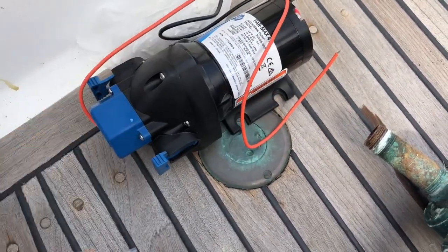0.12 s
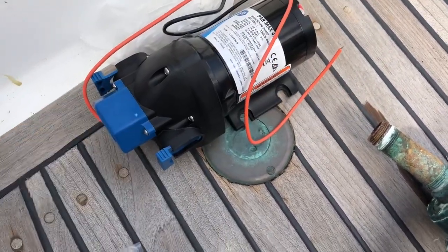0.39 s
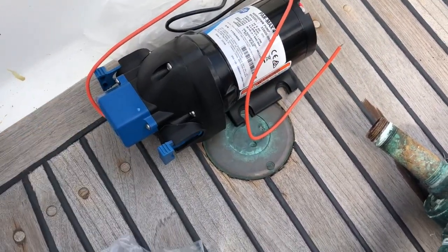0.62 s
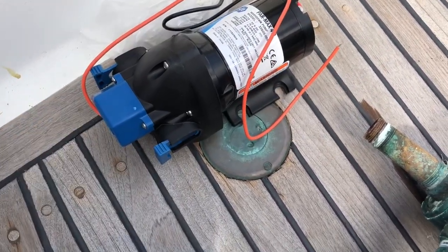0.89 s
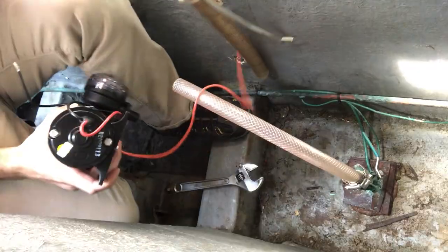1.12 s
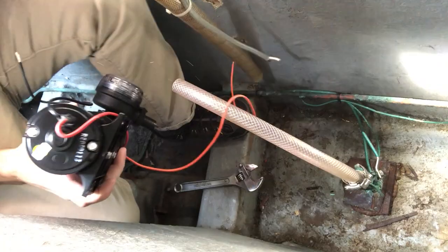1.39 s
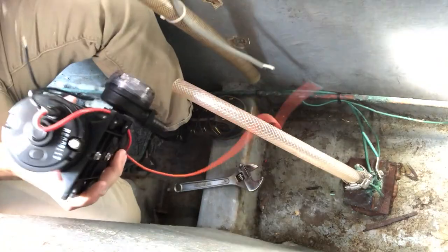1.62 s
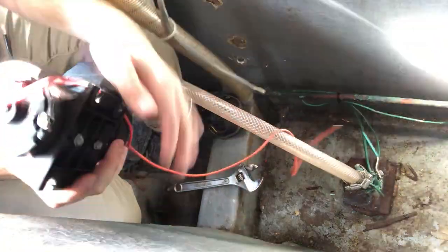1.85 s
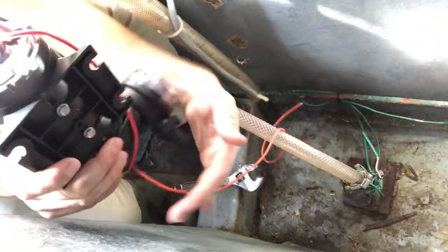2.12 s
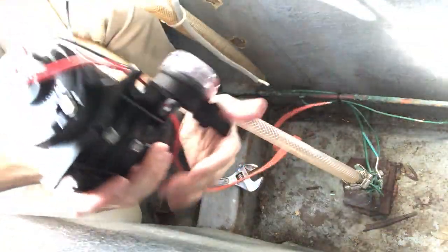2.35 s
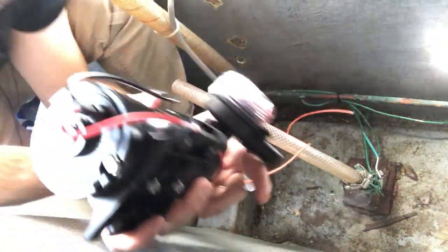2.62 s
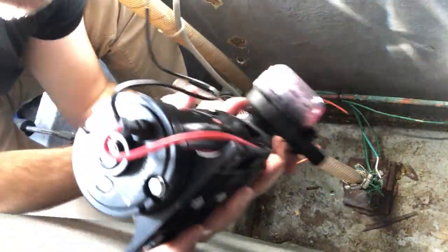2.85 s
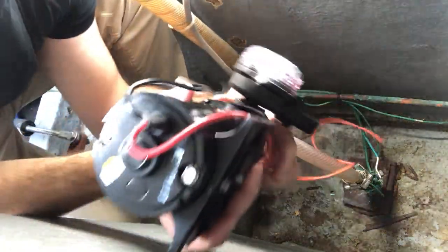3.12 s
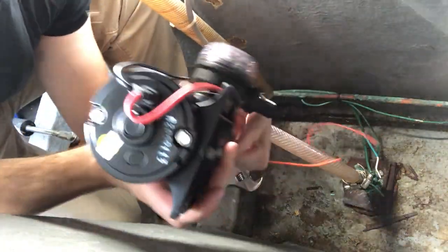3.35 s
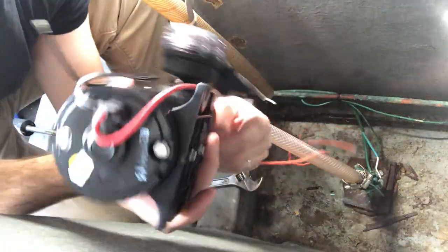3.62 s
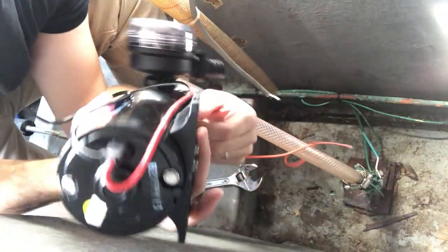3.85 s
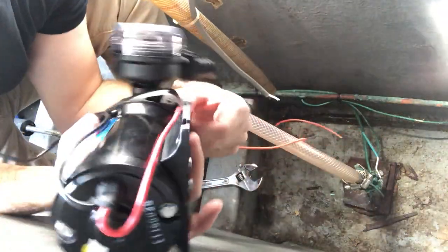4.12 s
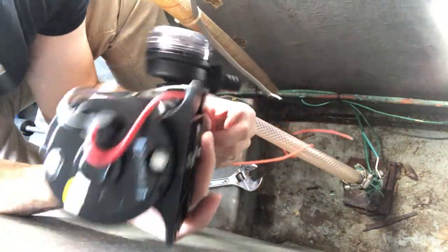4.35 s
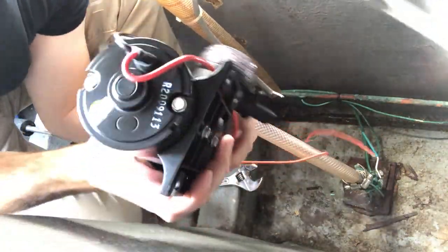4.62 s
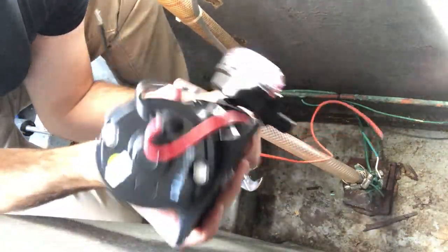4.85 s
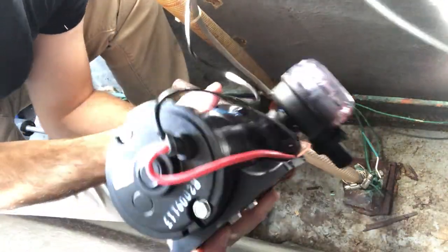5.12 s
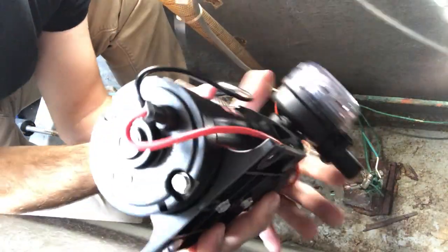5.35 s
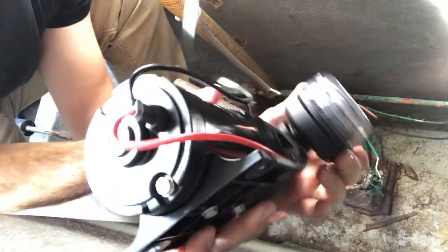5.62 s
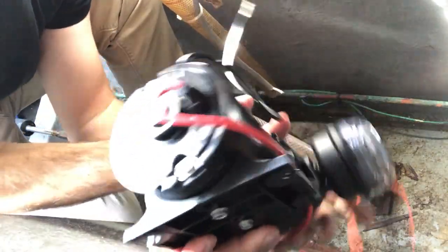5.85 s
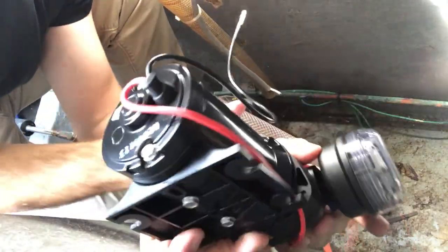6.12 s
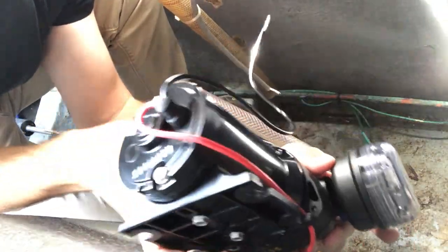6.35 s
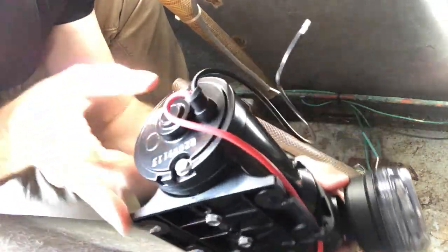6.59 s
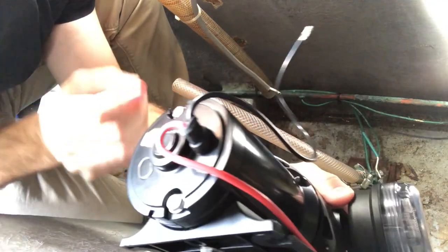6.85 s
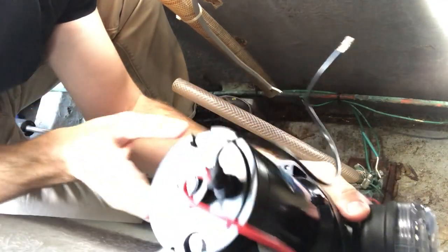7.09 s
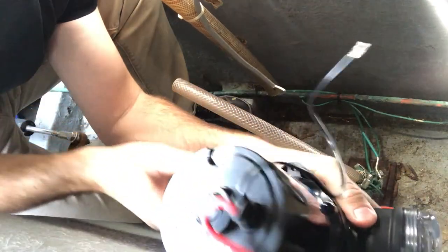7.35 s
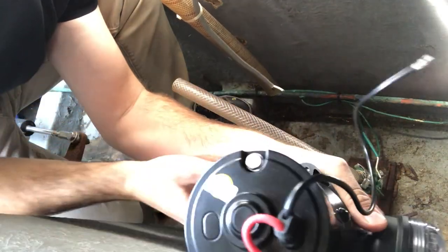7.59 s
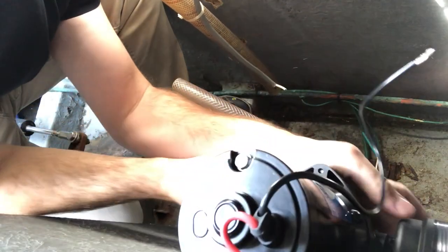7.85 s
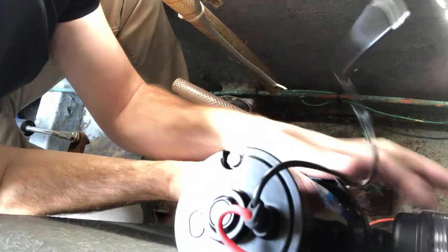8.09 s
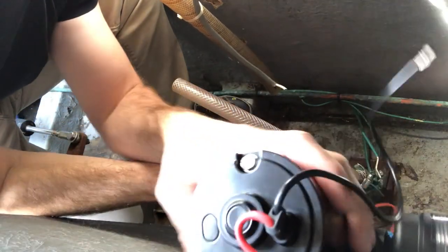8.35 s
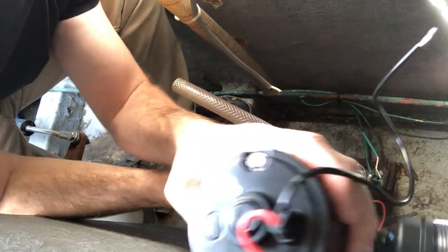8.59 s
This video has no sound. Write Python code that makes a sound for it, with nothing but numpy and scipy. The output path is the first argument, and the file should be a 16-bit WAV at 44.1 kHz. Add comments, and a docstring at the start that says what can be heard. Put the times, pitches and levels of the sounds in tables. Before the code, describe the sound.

Close microphone, mono. About half a second of low deck rumble, then sharp dry crackles of stiff wrapping and a tiny clip bouncing. The place changes abruptly to a small hollow locker: hands, hose and wires rub a plastic pump, with soft knocks, one dull boom midway, a quiet lull, a hard double clack, squeaky scrapes, and finally deep thumps with bright clicks.

```python
"""A plastic pump and its fittings are handled close to the microphone: hands, hose and wires rub and scrape in strokes.
The strokes are shaped noise, and some sing as narrow bands; small parts tick as short noise bursts.
First comes an open boat deck, where wrapping crackles over a low rumble, all made from filtered noise.
Then comes a small locker whose hollow air booms at every knock, as a set of dying sine tones."""
import sys
import numpy as np
from scipy import signal
from scipy.fft import rfft, irfft, next_fast_len
from scipy.io import wavfile
from scipy.ndimage import uniform_filter1d, map_coordinates

SR = 44100
rng = np.random.default_rng(int(sys.argv[2]) if len(sys.argv) > 2 else 0)


def to_wav(sig):
    """Store sig (one row per channel, or 1-D mono) as 16-bit WAV at the path in sys.argv[1].

    Samples outside -1..1 are clipped; the rate is SR.
    """
    pcm = np.clip(np.atleast_2d(sig), -1, 1) * 32767
    pcm = np.round(pcm).astype(np.int16)
    wavfile.write(sys.argv[1], SR, pcm.T)  # frames by channels


def ratio_of_db(decibels):
    """Turn decibels (scalar or array-like) into linear amplitude factors; 0 dB maps to 1."""
    return 10 ** (np.asarray(decibels, float) / 20)


N = 384552  # length in samples
INSIDE_S = 1.07  # from here on the scene is in the locker

# faint hiss of air and microphone, before scaling to rms 1: f/Hz, level/dB
FAR_HISS_COLOUR = [(290, -49), (500, 3), (1340, -11), (7640, -26), (9360, -17), (11600, -26), (16000, -4.5)]
# loudness of the background rumble: t/s, level/dB
RUMBLE_LEVEL = [(0, -44), (1.05, -48), (1.15, -53.5), (1.5, -56.5), (2.4, -58.5), (4.1, -58.5),
                (4.4, -54.5), (5.2, -62), (5.9, -55), (6.4, -58.5), (7.3, -57), (7.6, -48.5), (8.35, -43.5),
                (8.72, -60)]
# rumble in the open, before scaling to rms 1: f/Hz, level/dB
DECK_COLOUR = [(15, -48), (25, -22), (46, -15), (75, 3), (166, -10), (238, -29), (399, -24), (659, -33.5),
               (1200, -33.5), (2200, -42), (4500, -72)]
# rumble inside the locker, before scaling to rms 1: f/Hz, level/dB
LOCKER_COLOUR = [(15, -81), (25, -39), (36, -15.5), (60, -2.5), (74, -5.5), (91, -14.5), (151, -14),
                 (216, -13.5), (262, -26), (1200, -45), (1560, -88), (2640, -120)]
# what the locker and pump body ring with: f/Hz, level/dB, base t60/s (knocks ring shorter)
HOLLOW_MODES = [(72.8, 15.5, 0.39), (160.2, 9, 0.32), (186.2, 3, 0.28), (235.1, 0, 0.27),
                (254.7, 2.5, 0.34), (299, -2.5, 0.15), (361.3, -6.5, 0.25), (441, -2, 0.19),
                (487.5, 2.5, 0.34), (543, -1, 0.47), (667, -4.5, 0.34), (795.5, 0.5, 0.24), (882, 6, 0.15),
                (990, -5, 0.55), (1080, 5.5, 0.12), (1235, -1, .16), (1310, 5.5, 0.064), (1410, -4, 0.47)]
# dull knocks that shake the locker: t/s, level/dB before the last filter, centre f/Hz, spread/octaves,
# contact/s (cut shorter for modes above 600 Hz)
LOCKER_KNOCKS = [(1.078, -35, 293, 0.64, 0.042), (1.177, -36.5, 790, 1.6, 0.029),
                 (1.295, -41.5, 228, 0.52, 0.026), (1.511, -37, 201, 1.26, 0.042),
                 (1.911, -48, 450, 0.48, 0.012), (2.128, -43.5, 211, 1.34, 0.016),
                 (2.361, -32.5, 284, 0.81, 0.016), (3.283, -35, 554, 0.23, 0.0096),
                 (3.300, -41, 510, 0.3, 0.023), (3.673, -54, 1150, 0.23, 0.0093),
                 (4.046, -50.5, 1120, 0.2, 0.012), (4.206, -24, 316, 0.56, 0.018),
                 (4.206, -44, 1310, 0.11, 0.027), (5.378, -53.5, 1140, 0.37, 0.01),
                 (5.94, -30, 900, 1.7, 0.0095), (5.97, -16.5, 690, 1.25, 0.0064),
                 (6.364, -39, 1080, 0.47, 0.019), (6.49, -43, 1310, 0.41, 0.03),
                 (6.849, -37.5, 415, 1.7, 0.012), (7.443, -17, 144, 0.97, 0.02),
                 (7.788, -35, 135, 1.03, 0.016), (7.92, -15, 152, 0.93, 0.019),
                 (8.249, -32, 1430, 0.97, 0.013), (8.278, -23, 134, 0.66, 0.02),
                 (8.546, -33, 149, 0.93, 0.011), (8.68, -19.5, 270, 0.61, 0.042)]
# time the locker echo takes to die: f/Hz, t60/s
WALL_DECAY = [(500, 0.3), (2000, 0.14), (6000, 0.11), (14000, 0.2)]
# fittings ticking and cracking: t/s, level/dB, colour f/Hz, colour width/octaves (at most 6 used), t60/s
FITTING_TICKS = [(1.179, -27, 3020, 6.7, 0.077), (1.242, -36.5, 3120, 2.3, 0.018),
                 (3.276, -39, 4630, 2, 0.014), (3.625, -45, 4870, 0.34, 0.017),
                 (3.6741, -42.5, 2180, 5, 0.039), (4.046, -36, 5000, 2, 0.01),
                 (4.209, -42.5, 2170, 1.5, 0.026), (4.361, -49.5, 3950, 1.6, 0.038),
                 (5.3758, -28.5, 5240, 3.5, 0.011), (5.9404, -19, 1940, 3.9, 0.031),
                 (5.9724, -20.5, 1770, 4.6, 0.059), (6.157, -43, 1930, 1.9, 0.045),
                 (6.245, -47, 11800, 0.57, 0.066), (6.3674, -42.5, 1680, 1.4, 0.043),
                 (6.6887, -37, 7700, 5.4, 0.029), (6.8503, -33, 2820, 3.6, 0.0052),
                 (7.181, -39, 4770, 0.49, 0.017), (7.417, -41, 1560, 1.9, 0.018),
                 (7.445, -32.5, 1600, 1.5, 0.024), (7.8334, -33.5, 2880, 2.7, 0.013),
                 (7.9204, -50, 1620, 1.1, 0.0083), (7.9382, -26, 2200, 2.04, 0.026),
                 (8.0222, -35, 1710, 0.93, 0.01), (8.2499, -14, 7000, 4.5, 0.026),
                 (8.2834, -17, 3840, 2.6, 0.023), (8.4745, -46, 2280, 3.9, 0.022),
                 (8.6623, -46.5, 1690, 2.1, 0.025), (8.6827, -43, 1850, 2.9, 0.033)]
# resonances of the hard plastic fittings: f/Hz, width/Hz, level/dB
FITTING_RINGS = [(1150, 1600, 11.5), (1494, 43, 8), (2660, 570, -5), (3200, 1160, 1.5), (4670, 1700, -8.5),
                 (5670, 1170, 3), (7000, 350, 5)]
# loud snaps on the deck, the first of them a dull knock: t/s, level/dB, colour f/Hz, treble snap level/dB over
# the body
DECK_SNAPS = [(0.4425, -43, 700, -30), (0.5066, -43, 4680, 0), (0.4719, -30, 5700, -7),
              (0.5212, -22.5, 7520, 2), (0.5325, -31, 1880, 2), (0.558, -27, 5000, 2),
              (0.5746, -25, 5600, -22), (0.595, -45, 2320, -20), (0.6818, -34.5, 3900, -30),
              (0.702, -35, 3710, -6), (0.7154, -40, 2440, -5), (0.749, -37, 2700, -21),
              (0.765, -29, 4430, -25), (0.782, -24, 3560, -35), (0.822, -24, 4200, -32),
              (0.8425, -30, 4940, -5), (0.8447, -25.5, 4200, 0), (0.8659, -49, 2910, -15),
              (0.9233, -31.5, 5240, -14), (0.979, -44, 4870, -4)]
# strokes in which one part sings: start t/s, end t/s, f/Hz, filter width/Hz, rms level/dB before fades
SINGING_BANDS = [(1.38, 1.505, 1560, 69, -61.5), (1.52, 1.957, 193, 18, -60), (3.55, 4.105, 216, 50, -67),
                 (3.669, 3.96, 1120, 100, -69.5), (5.597, 5.786, 2570, 340, -79),
                 (6.356, 6.48, 7400, 1200, -65), (6.502, 6.573, 7600, 700, -62.5),
                 (6.547, 6.73, 3060, 350, -64), (6.55, 6.67, 4470, 350, -64),
                 (6.903, 6.977, 3440, 400, -71), (6.15, 6.36, 860, 110, -59.5),
                 (6.15, 6.33, 1400, 110, -65), (7.06, 7.22, 1240, 59, -55.5), (7.04, 7.15, 1080, 84, -57),
                 (5.0, 5.3, 820, 120, -76.5), (4.3, 4.58, 500, 100, -68.5), (7.0, 7.2, 5600, 600, -68),
                 (8.02, 8.19, 820, 100, -62)]
# bright scrape, before scaling to rms 1: f/Hz, level/dB
SCRAPE_COLOUR = [(650, -21), (1100, -9.5), (1170, -5), (1280, -9), (1390, -4.5), (1830, -3.5), (4950, -1),
                 (9000, -18.5), (11700, -18.5), (19800, -120)]
# dull drag, before its resonances and scaling to rms 1: f/Hz, level/dB
DRAG_COLOUR = [(76, -50), (130, -15.5), (161, 2), (321, -4), (468, -1), (727, -5), (1070, -8),
               (1700, -12.5), (3000, -14), (8000, -70)]
# fine hiss of rubbing, before scaling to rms 1: f/Hz, level/dB
RUB_HISS_COLOUR = [(4410, -10.5), (7500, -5), (8730, -10), (13300, -10), (16000, -13)]
# how busily the hands shift their grip between strokes: t/s, scrape level/dB
GRIP_LEVEL = [(0, -77), (.4, -75.5), (1.0, -56), (1.6, -63), (1.72, -67), (2.0, -64.5), (3.3, -62.5),
              (3.5, -71), (4.1, -75.5), (4.9, -78.5), (5.1, -71.5), (5.9, -70), (6.7, -68.5), (6.85, -71.5),
              (7.6, -72), (8.1, -58.5), (8.6, -76), (8.72, -71)]
# rubbing strokes: start t/s, length/s, scrape level/dB, dull drag level/dB, fine hiss level/dB
RUB_STROKES = [(0.334, 0.29, -80, -59, -69), (0.478, .12, -49.5, -52, -53.5),
               (0.687, 0.15, -48, -59.5, -53.5), (0.871, 0.1, -58, -69, -49.5),
               (1.05, 0.16, -76, -73, -76.5), (1.196, 0.13, -67, -55, -65),
               (1.455, 0.14, -60.5, -57, -62.5), (1.705, 0.23, -70, -58.5, -65),
               (1.915, 0.24, -58.5, -88, -57.5), (2.108, 0.024, -73, -66, -61),
               (2.21, 0.17, -61.5, -82, -61), (2.363, 0.41, -65, -84, -58.5),
               (2.716, 0.41, -86, -64.5, -73), (2.969, .17, -66, -66, -56.5), (3.223, 0.17, -71, -84, -60),
               (3.486, 0.069, -70.5, -63, -78), (3.596, 0.037, -78, -59, -65), (3.652, 0.13, -80, -65, -91),
               (3.744, 0.038, -69, -68, -74), (3.889, 0.064, -74, -65.5, -71), (4.337, 0.1, -71, -68, -74),
               (4.45, 0.13, -81, -70, -88), (4.623, 0.023, -75, -79, -75), (4.997, 0.13, -70, -65.5, -80),
               (5.24, 0.17, -68, -76, -74), (5.37, 0.065, -68, -70, -60), (5.535, .18, -71.5, -90, -65.5),
               (5.69, 0.22, -88, -73, -72), (6.114, 0.21, -61.5, -55, -73), (6.35, 0.14, -60, -61.5, -62.5),
               (6.48, 0.099, -55.5, -51.5, -59), (6.584, 0.1, -62, -59.5, -58.5),
               (6.998, .2, -55.5, -48, -70), (7.27, 0.069, -71.5, -73, -73), (7.576, 0.046, -68, -59, -83),
               (7.685, 0.031, -71, -64, -71), (7.711, 0.19, -69, -52, -70), (7.965, .12, -80, -60, -55.5),
               (8.114, 0.24, -68.5, -56.5, -52), (8.319, .16, -65, -63, -65.5)]


def unit(x):
    """Scales a sound to rms 1."""
    return x / np.sqrt(np.mean(x ** 2) + 1e-20)


def peak(x):
    """Scales a sound to peak 1."""
    return x / np.abs(x).max()


def along(points, hz):
    """Reads a curve of (frequency, value) points on a log frequency axis."""
    f, v = np.transpose(points)
    return np.interp(np.log(hz + 1), np.log(f + 1), v)


def curves(rows):
    """Gives one value per sample for each column after the time."""
    s, *cols = np.transpose(rows)
    return [np.interp(np.arange(N) / SR, s, c) for c in cols]


def wobble(rate):
    """Draws a smooth random curve with this many knots a second."""
    return map_coordinates(rng.standard_normal(N // 100), [np.arange(N) * rate / SR])


def filtered(x, response):
    """Multiplies the spectrum of x by a response that depends on frequency."""
    m = next_fast_len(len(x) + 4096)
    return irfft(rfft(x, m) * response(np.fft.rfftfreq(m, 1 / SR)), m)[:len(x)]


def resonance(hz, centre_hz, width_hz):
    """Response of something that rings at one frequency, with gain 1 at its centre."""
    return 1j * hz * width_hz / (centre_hz ** 2 - hz ** 2 + 1j * hz * width_hz)


def add(track, s, sound):
    """Mixes a sound into the track at time s in seconds."""
    part = track[round(s * SR):][:len(sound)]
    part += sound[:len(part)]


def patchy(x, patch_db, window, bins, frames):
    """Raises and lowers random patches of time and frequency; bins and frames set the patch size."""
    z = signal.stft(x, nperseg=window)[2]
    field = uniform_filter1d(rng.standard_normal(z.shape), bins, axis=0)
    field = uniform_filter1d(field, frames, axis=1)
    return signal.istft(z * ratio_of_db(patch_db * unit(field)), nperseg=window)[1][:N]


def grit(spectrum, flutter_db, flutter_rate, patchy_db):
    """Coloured noise of rms 1 with a random flutter in level and patches of colour."""
    noise = rng.standard_normal(N) * ratio_of_db(flutter_db * wobble(flutter_rate))
    noise = patchy(noise, patchy_db, window=512, bins=6, frames=8)
    return unit(filtered(noise, lambda hz: ratio_of_db(along(spectrum, hz))))


def streaked(x):
    """Random narrow streaks of tone slowly come and go in the rubbing."""
    return unit(patchy(x, 2.8, window=1024, bins=2, frames=16))


def far_hiss():
    """A faint, slightly uneven hiss of air and microphone lies under everything."""
    return ratio_of_db(-84.0) * grit(FAR_HISS_COLOUR, flutter_db=3.0, flutter_rate=5.1, patchy_db=4.5)


def rumble():
    """Water and wind shake the hull; the locker mostly lets its low booms through."""
    level_db, = curves(RUMBLE_LEVEL)
    inside = np.clip((np.arange(N) / SR - INSIDE_S) * 100, 0, 1)  # crossfade of 10 ms
    deck = grit(DECK_COLOUR, flutter_db=.3, flutter_rate=9, patchy_db=.3)
    locker = grit(LOCKER_COLOUR, flutter_db=.8, flutter_rate=6, patchy_db=.6)
    return ratio_of_db(level_db) * ((1 - inside) * deck + inside * locker)


def hollow_mode(t, hz, t60, contact):
    """One mode builds up, holds while the contact lasts, then rings out; low modes build up later."""
    rise = 1 - np.exp(-t / (0.019 * (80 / hz) ** 1.66))
    hold = contact * min(1, 600 / hz)
    fall = ratio_of_db(-60 * np.maximum(t - hold, 0) / (0.68 * t60))
    # a random drift of phase roughens each ringing tone, more for higher ones up to 500 Hz
    drift = np.cumsum(rng.standard_normal(len(t))) * .028 * min(1, (hz / 500) ** 2)
    detune = 1 + rng.normal(0, .006)
    return rise * fall * np.sin(2 * np.pi * hz * detune * t + drift)


def knocks():
    """A soft contact drives the hollow modes, most of all those near its centre, and adds a noisy thud."""
    out = np.zeros(N)
    t = np.arange(SR // 3) / SR
    for s, db, centre_hz, octaves, contact in LOCKER_KNOCKS:
        ring = np.zeros(len(t))
        for hz, mode_db, t60 in HOLLOW_MODES:
            # far modes still stir a little
            near_db = max(-6 * (np.log2(hz / centre_hz) / octaves) ** 2, -30)
            reach_db = near_db + rng.normal(0, 1.2)
            ring += ratio_of_db(mode_db + reach_db) * hollow_mode(t, hz, t60, contact)
        swell = 1 - np.exp(-t * centre_hz / 0.14)
        push = swell * ratio_of_db(-60 * t / 0.32) * rng.standard_normal(len(t))
        thud_width_hz = 3.8 * octaves ** 2 * centre_hz
        thud = filtered(push, lambda f: resonance(f, 0.56 * centre_hz, thud_width_hz) ** 2)
        blow = peak(ring) + .33 * peak(thud)
        add(out, s, ratio_of_db(db) * blow)
    return filtered(out, lambda f: resonance(f, 490, 3860) ** 2)


def walls(length):
    """A fresh diffuse echo of energy 1, each frequency dying at its own speed."""
    hz, t, z = signal.stft(rng.standard_normal(length), SR, nperseg=128)
    fade = ratio_of_db(-60 * t / along(WALL_DECAY, hz)[:, None])
    tail = signal.istft(z * fade, SR, nperseg=128)[1][:length]
    return tail / np.linalg.norm(tail)


def wrapping():
    """Wrapping being worked crackles: listed loud snaps after a first dull knock, with small crinkles at random
    times."""
    count, start_s, end_s = 7, .49, 1.0
    when = rng.uniform(start_s, end_s, count)
    chance = rng.standard_normal((count, 2))
    small = [(s, -43 + 3 * a, 3000 * np.exp(0.47 * b), -14) for s, (a, b) in zip(when, chance)]
    octaves, t60_s = 2.4, .010
    return [(s, db, hz, octaves, t60_s, snap_db) for s, db, hz, snap_db in [*DECK_SNAPS, *small]]


def dropped_clip(snap_db):
    """A small clip drops and bounces ever faster, each flight shorter and each hit softer."""
    drop_s, flight_s, shrink = 1.0137, .0201, .73
    hits = []
    for k in range(4):
        s = drop_s + flight_s * (1 - shrink ** k) / (1 - shrink)
        hits.append((s, -21 - 4 * k, 4550, .53, .010, snap_db))
    return hits


def contacts():
    """Rows of every crinkle, bounce and tick: t/s, level/dB, f/Hz, width/octaves, t60/s, snap/dB."""
    snap_db = -25  # treble snap over the body
    return wrapping() + dropped_clip(snap_db) + [(*row, snap_db) for row in FITTING_TICKS]


def fitting_rings(hz):
    """Hard plastic favours its own resonances over a plain share of the sound."""
    return .5 + sum(ratio_of_db(db) * resonance(hz, centre, width) for centre, width, db in FITTING_RINGS)


def ticks():
    """Each tick is a spike and a dying rattle in its own colour, with a treble snap and an echo."""
    out = np.zeros(N)
    t = np.arange(SR // 5) / SR
    for s, db, hz, octaves, t60, snap_db in contacts():
        in_locker = s > INSIDE_S
        burst = 0.89 * ratio_of_db(-60 * t / t60) * rng.standard_normal(len(t))
        burst[0] += 6  # the spike
        width_hz = hz * np.clip(octaves, .05, 6) * np.log(2)
        top_hz = 9000 if in_locker else 16000  # the locker dulls the far treble

        def colour(f):
            return resonance(f, hz, width_hz) ** 2 * fitting_rings(f) / (1 + 1j * f / top_hz) ** 2

        body = filtered(burst, colour)
        snap = filtered(burst, lambda f: resonance(f, 12000, 9000) ** 2)
        tick = ratio_of_db(db) * (peak(body) + ratio_of_db(snap_db) * peak(snap))
        echo = signal.fftconvolve(tick, walls(len(t)))[:len(t)]
        echo_db = 3 if in_locker else -14
        add(out, s, tick + ratio_of_db(echo_db) * echo)
    return out


def singing():
    """Narrow noise with quick starts and ends, where friction settles on one resonance."""
    out = np.zeros(N)
    for start, end, hz, width_hz, db in SINGING_BANDS:
        n = round((end - start) * SR)
        band = unit(filtered(rng.standard_normal(n), lambda f: resonance(f, hz, width_hz) ** 2))
        add(out, start, ratio_of_db(db) * signal.windows.tukey(n, .4) * band)
    return out


def strokes():
    """Gains of scrape, drag and hiss: every stroke swells, holds and stops over the restless grip."""
    t = np.arange(N) / SR
    grip_db, = curves(GRIP_LEVEL)
    over_scrape_db = np.array([[0], [1], [-3.5]])  # scrape, drag, hiss
    power = ratio_of_db(grip_db + 0.86 * wobble(9.4) + over_scrape_db) ** 2
    for start, length, *db in RUB_STROKES:
        swell = (t - start) / (0.26 * length + 0.011)
        stop = (start + length - t) / 0.059 + 1  # falls to nothing in 0.059 s
        shape = np.clip(np.minimum(swell, stop), 0, 1)
        power = power + np.outer(ratio_of_db(np.array(db)), shape ** 2) ** 2
    return np.sqrt(power)


def rubbing():
    """Skin, hose and wrapping slide: bright scrape, fine hiss and a dull drag that feeds the hollow modes."""
    scrape_gain, drag_gain, hiss_gain = strokes()
    on_deck = np.arange(N) < INSIDE_S * SR
    catch = ratio_of_db(.8 * wobble(25))  # the same small catches show in every band
    # hard strokes move in jerks, stiff wrapping most
    hardness = np.clip((20 * np.log10(scrape_gain) + 68) / 12, 0, 1)
    jerk = hardness * np.where(on_deck, 1, .45)
    crinkle = ratio_of_db(jerk * (5 * wobble(420) - 2.8))
    scrape = scrape_gain * streaked(grit(SCRAPE_COLOUR, flutter_db=1.5, flutter_rate=300, patchy_db=1.8))
    hiss = hiss_gain * grit(RUB_HISS_COLOUR, flutter_db=1.2, flutter_rate=400, patchy_db=.6)
    rough = streaked(grit(DRAG_COLOUR, flutter_db=1.5, flutter_rate=90, patchy_db=1))

    def boom(f):  # all hollow modes but the lowest
        return 3.5 + sum(resonance(f, hz, 6 / t60) for hz, _, t60 in HOLLOW_MODES[1:])

    drag = drag_gain * unit(filtered(rough, boom))
    return catch * (crinkle * (scrape + hiss) + drag)


def scene():
    """Adds up everything heard at one microphone."""
    background = far_hiss() + rumble()
    handling = knocks() + ticks() + singing() + rubbing()
    return (background + handling)[None]


def top_cut(x):
    """Nothing passes above the cut-off."""
    return signal.sosfilt(signal.butter(12, 16660, fs=SR, output="sos"), x)


def record(dry):
    """The recorder keeps nothing from 15950 Hz upward in the mix it passes on."""
    mix = filtered(dry[0], lambda hz: hz < 15950)[None]
    return top_cut(mix)


dry = scene()
out = record(dry)
to_wav(out)
```